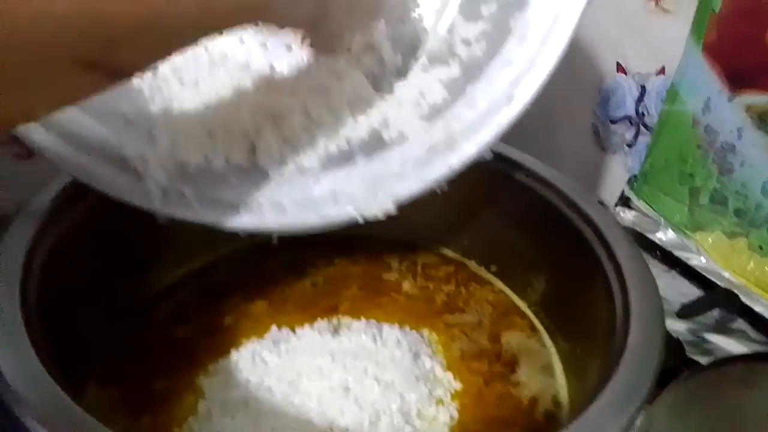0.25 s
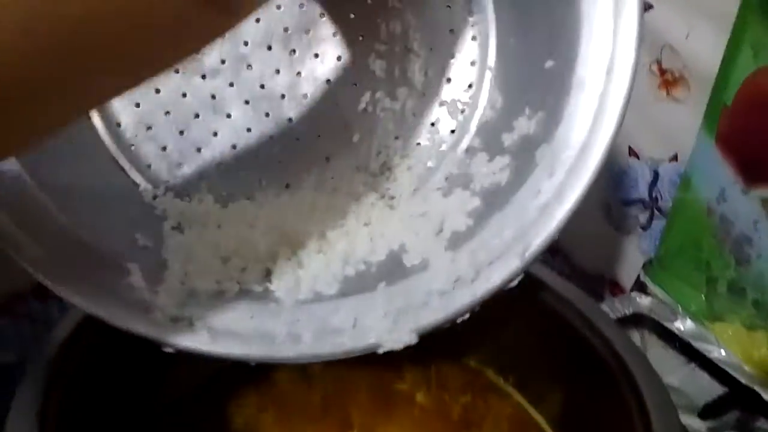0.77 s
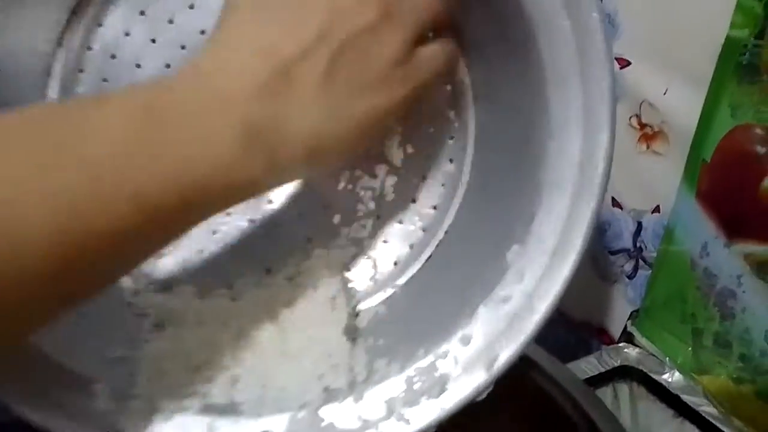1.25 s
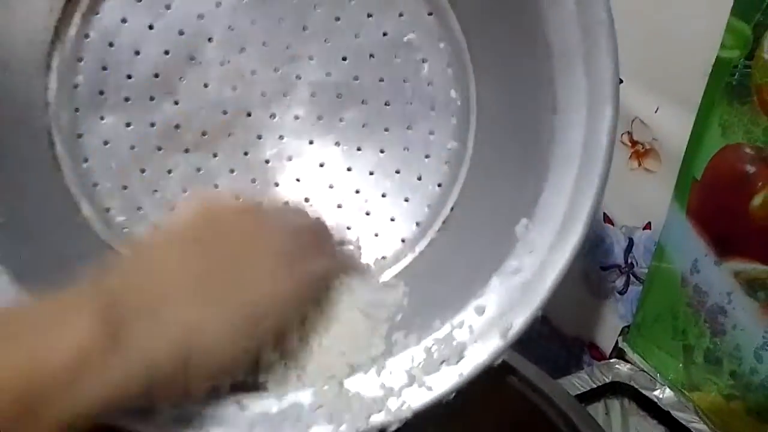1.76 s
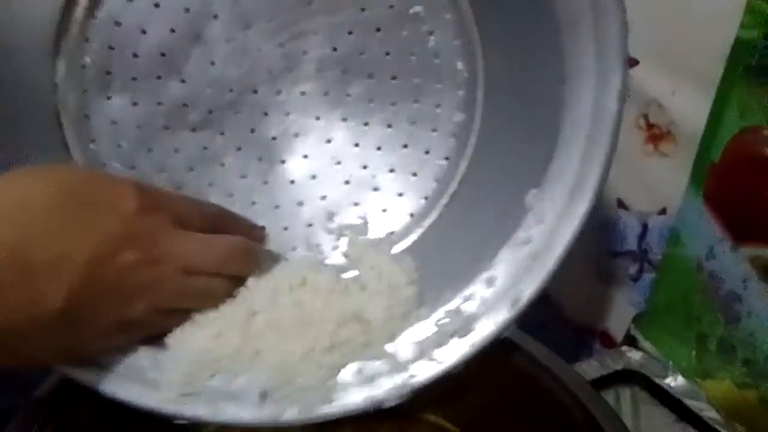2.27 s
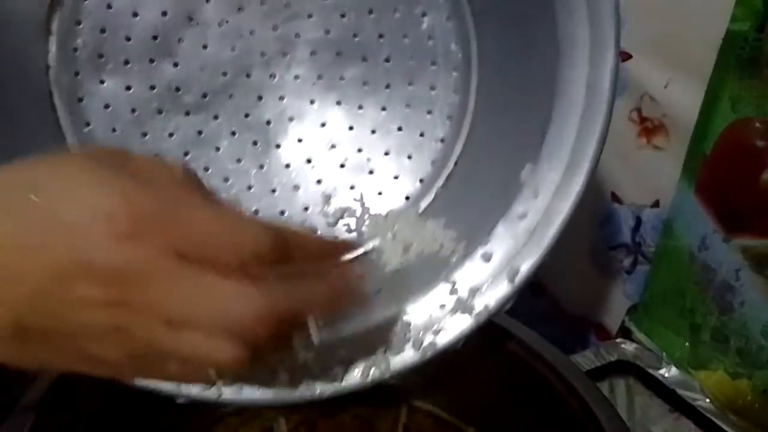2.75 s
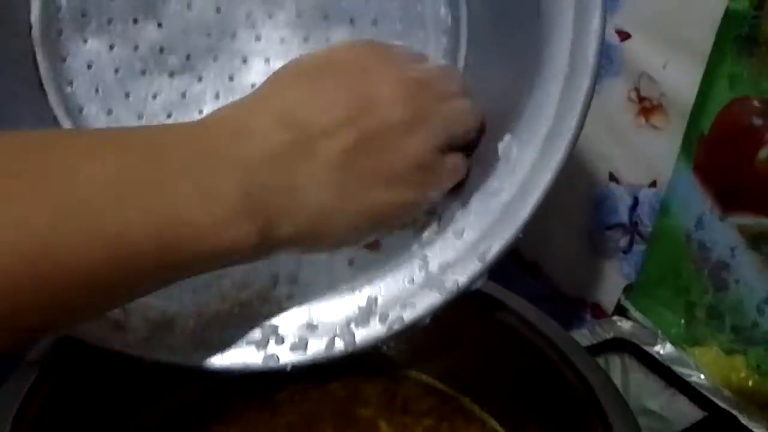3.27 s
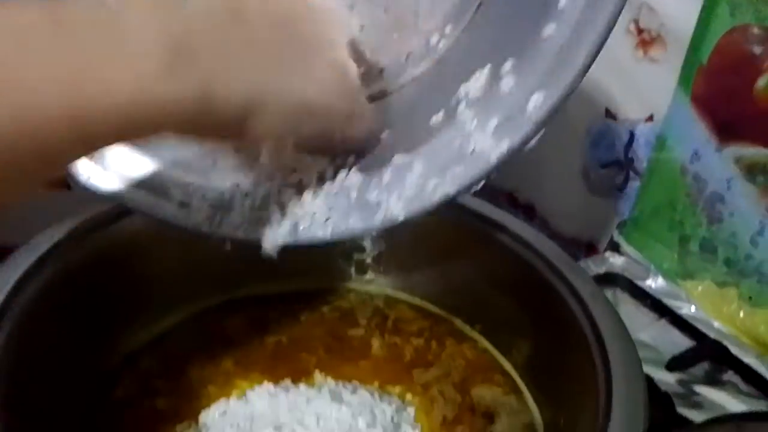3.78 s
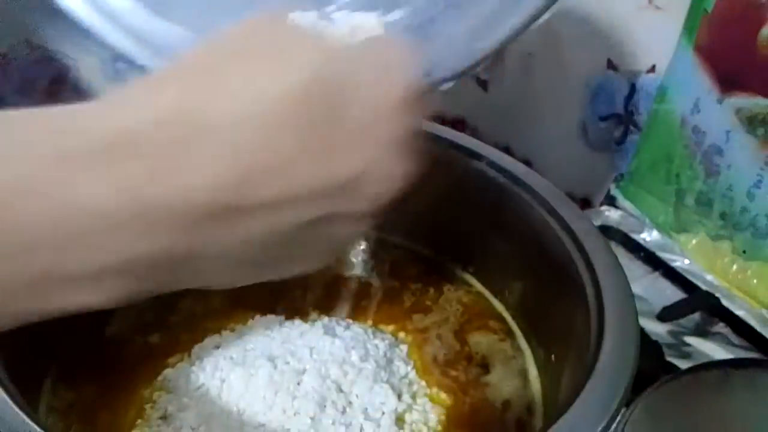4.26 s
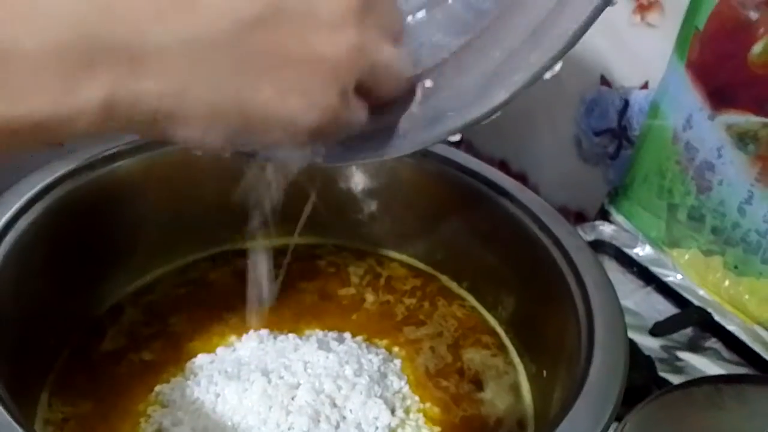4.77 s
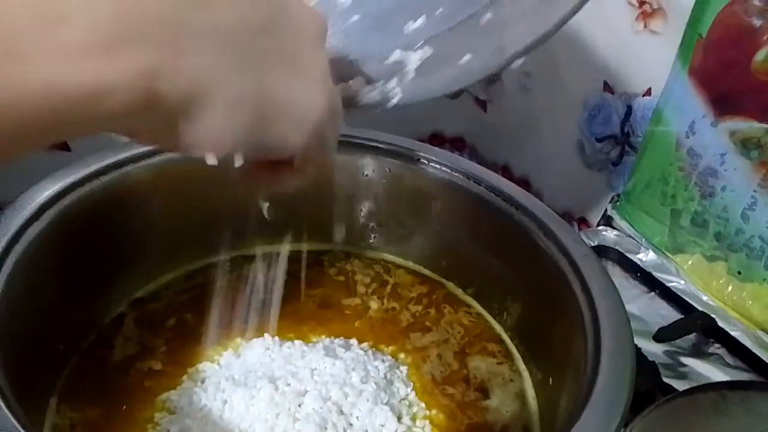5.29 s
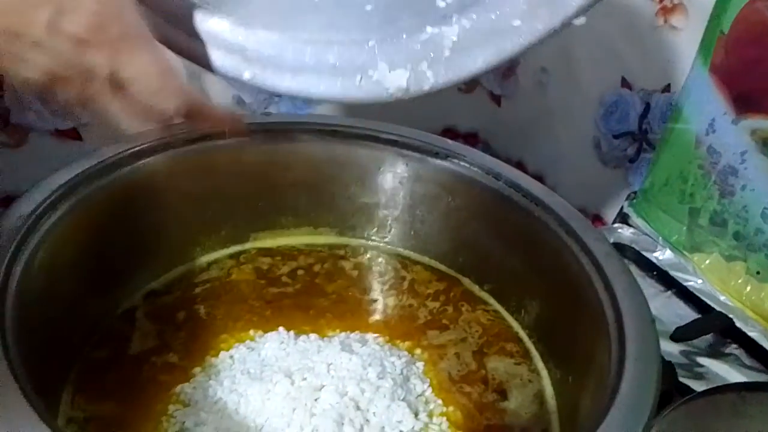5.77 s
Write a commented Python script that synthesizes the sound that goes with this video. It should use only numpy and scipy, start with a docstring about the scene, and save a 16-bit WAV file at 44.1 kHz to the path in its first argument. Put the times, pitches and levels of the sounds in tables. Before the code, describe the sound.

Close up in a small hard kitchen, a hand scrapes wet rice out of an aluminium colander. An early bump rings the bowl, then short strokes rasp and crackle, with nail ticks and faint finger squeaks. A burner and hum continue softly underneath. The scraping thins out, a quiet gap follows, and two loud, ringing knocks on the full pot's rim close the scene.

```python
"""Wet rice crackles and rasps as a hand sweeps it out of an aluminium colander into a pot, in a small tiled kitchen.
The rice is made of random clicks, coloured by wet films, dragged grains and the pressed sheet of metal.
Fingers squeak on the metal as gliding bands of noise; bumps and nail ticks ring it through its modes.
A clump of rice slumps as dull noise, over a steady burner, a hum and the faint ticks of the simmering pot.
At the end the hand knocks on the rim of the pot to shake off the last grains: cracks, modes and low thumps."""
import sys
import numpy as np
from scipy import signal
from scipy.io import wavfile

SR = 44100
rng = np.random.default_rng(int(sys.argv[2]) if len(sys.argv) > 2 else 0)


def wav_record(signal):
    """Record a signal, one row per channel, as 16-bit PCM in the file named by sys.argv[1]."""
    frames = np.transpose(np.atleast_2d(signal))
    bounded = np.clip(frames, -1, 1)
    # unit amplitude maps onto the largest positive 16-bit level
    quanta = np.round(bounded * 32767).astype(np.int16)
    wavfile.write(sys.argv[1], SR, quanta)


N = 265923
T = np.arange(N) / SR  # seconds

# broad resonances of the sheet while the hand presses on it: centre_hz, width_hz, relative level_db
PRESSED_SHEET = [(1251, 98, -3), (1950, 70, -29), (2432, 48, 2.5), (2756, 143, 2.5), (3255, 37, 6),
                 (3607, 163, 3.5), (3950, 170, -5.5), (4370, 81, -3.5), (4700, 125, 4.5), (5200, 180, -7),
                 (5640, 210, 2), (6170, 102, -16.5), (6420, 340, -6), (6710, 130, -1.5), (7000, 160, -4.5),
                 (7740, 203.5, 3), (7700, 180, 2), (9060, 175, 3), (9860, 770, -15.5)]


def amp(db):
    """Turns decibels into a gain."""
    return 10 ** (np.asarray(db) / 20)


def evened(x):
    """Scales to rms 1."""
    return x / np.sqrt(np.mean(x ** 2) + 1e-20)


def unit(x):
    """Scales to energy 1."""
    return x / np.sqrt(np.sum(x ** 2) + 1e-20)


def read(points, hz):
    """Reads a curve on a log-frequency axis."""
    point_hz, value = np.transpose(points)
    return np.interp(np.log(hz + 1), np.log(point_hz + 1), value)


def add(mix, start_s, sound):
    """Mixes a sound in at its start time."""
    part = mix[max(round(start_s * SR), 0):][:len(sound)]
    part += sound[:len(part)]


def colour(x, points, size=4096):
    """Causal minimum-phase filter with the given spectrum and energy 1."""
    hz = abs(np.fft.fftfreq(size, 1 / SR))
    log_gain = np.log(amp(read(points, hz)))
    taps = np.fft.ifft(np.exp(np.conj(signal.hilbert(log_gain)))).real
    return signal.oaconvolve(x, unit(taps[:size // 2]))[:len(x)]


def soften(x, cutoff_hz):
    """A soft contact loses its treble: two equal one-pole low-passes."""
    pole = np.exp(-2 * np.pi * cutoff_hz / SR)
    return signal.lfilter([(1 - pole) ** 2], [1, -2 * pole, pole * pole], x)


def tail():
    """Dense echoes of noise, each band dying at its own speed."""
    # decay of the echoes: pitch_hz, t60_s
    room_decay = [(100, 0.4), (400, 0.78), (1200, 0.79), (2800, 0.63), (7300, 0.57), (15000, 0.51)]
    hz, t, bands = signal.stft(rng.standard_normal(SR), SR, nperseg=256)
    fade = amp(-60 * t / read(room_decay, hz)[:, None])
    echoes = signal.istft(bands * fade, SR, nperseg=256)[1][:SR]
    return unit(echoes * (1 - np.exp(-T[:SR] / 0.00067)))


def ring(modes, wash, wash_db, split=0.0044):
    """A vessel's answer to one tap: modes over a dense wash. It is not quite round, so each mode is a beating pair."""
    t = T[:SR]
    clear = np.zeros(SR)
    for hz, level_db, t60 in modes:
        for side in (-1, 1):
            split_hz = hz * (1 + split * side * rng.random())
            clear += amp(level_db - 60 * t / t60) * np.sin(2 * np.pi * (split_hz * t + rng.random()))
    return unit(unit(clear) + amp(wash_db) * unit(colour(tail(), wash)))


def chatter(decay, rise=0.25):
    """Energy-1 burst of tiny contacts that swells quickly and dies; decay in seconds, rise as a share of it."""
    t = T[:SR // 8]
    contacts = rng.choice([-1., 1.], len(t))
    swell = 1 - np.exp(-t / (rise * decay))
    return unit(contacts * swell * np.exp(-t / decay))


def grains(per_s, spread_db):
    """Clicks at random times, of random size and sign, evened to rms 1."""
    size = amp(spread_db * np.minimum(rng.exponential(1, N), 4)) * rng.choice([-1., 1.], N)
    return evened(size * (rng.random(N) < per_s / SR))


def clumping(rate_hz, depth_db):
    """Random gain: the grains give way in small bunches."""
    drift = evened(soften(rng.standard_normal(N), rate_hz))
    return evened(amp(depth_db * drift))


def effort(start, rise, hold, fade_db_per_s):
    """Gain that rises, holds and dies away; times in seconds."""
    fading_s = np.maximum(T - start - rise - hold, 0)
    return np.clip((T - start) / rise, 0, 1) * amp(-fade_db_per_s * fading_s)


def resonances(peaks):
    """Spectrum (Hz, dB) of steep-sided resonances over a low floor."""
    hz = np.fft.rfftfreq(4096, 1 / SR)
    gain = sum(amp(db) / (1 + ((hz - centre) / width) ** 2) ** 2 for centre, width, db in peaks)
    return np.column_stack([hz, 20 * np.log10(gain + amp(-43.5))])


def sheet_ring(t60, count=240):
    """The pressed sheet rings briefly in many close modes, grouped into its broad resonances."""
    t = T[:SR // 3]
    hz = np.linspace(1000, 11000, count) + rng.uniform(-20, 20, count)
    waves = np.sin(2 * np.pi * (hz[:, None] * t + rng.random((count, 1))))
    scatter_db = 9.9 * rng.standard_normal(count)
    level = amp(read(resonances(PRESSED_SHEET), hz) + scatter_db)
    return unit(level @ waves * amp(-60 * t / t60))


def hand():
    """The pressure of each stroke drives the rasp, the singing sheet and the wet crackle: three gain curves."""
    # strokes through the rice: start_s, rise_s, hold_s, grain rasp_db, sheet singing_db, wet crackle_db
    strokes = [(0, 0.0017, 0.021, -60, -59.5, -62), (0.069, 0.019, 0.13, -64.5, -56.5, -58),
               (0.464, 0.072, 0.024, -77, -47.5, -72), (0.84, 0.053, 0.013, -70, -49.5, -56),
               (1.29, 0.085, 0.14, -72, -82, -67), (1.596, 0.1, .1, -70, -77, -56.5),
               (2.2, 0.12, 0.077, -72, -101, -90), (2.472, 0.038, 0.074, -71.5, -71.5, -56.5),
               (2.733, 0.028, .09, -68.5, -79, -63), (2.87, 0.046, 0.38, -74, -84, -61.5),
               (3.27, .14, 0.22, -72, -82, -63.5), (3.78, 0.047, 0.015, -63.5, -74, -63.5),
               (4.038, 0.16, 0.1, -73.5, -74.5, -63), (4.425, 0.023, 0.045, -74, -87, -79)]
    ease_db_per_s = 113.5  # the pressure of every stroke dies away alike
    gains = np.zeros((3, N))
    for start, rise, hold, *levels_db in strokes:
        gains += amp(levels_db)[:, None] * effort(start, rise, hold, ease_db_per_s)
    return gains


def wet_rice(squeeze):
    """Water films between the grains burst in a high crackle; whole clumps snap louder and tick on the sheet."""
    # crackle of wet grains: pitch_hz, relative density_db (per Hz)
    squeeze_tone = [(1500, -88), (4000, -25), (7100, -11), (7750, 3.5), (8400, 7.5), (9050, 3), (9700, -13),
                    (10800, -31), (16000, -23.5)]
    # clumps that snap off the metal: start_s, level_db, sheet's answer against the wet burst body_db
    snaps = [(1.0395, -40, -9), (1.066, -37.5, -18), (1.6681, -44, -7), (1.829, -39.5, -24),
             (1.9117, -38, -37), (2.05, -44.5, -4), (2.155, -46, -7), (2.367, -50.5, 0), (2.4968, -38, -25),
             (2.635, -42.5, -12), (2.961, -42.5, -19), (3.005, -34.5, -5.5), (3.5194, -46, -21),
             (3.5483, -37.5, -24), (3.6808, -45, -6), (3.7404, -46, -29), (4.035, -46.5, -23),
             (4.0948, -43.5, -3.5), (4.4365, -49, -10)]
    snap_decay_s, burst_db, answer_db = 0.002, 1.5, 0.5
    # the rice crackles by itself until the colander is empty
    crackle_db, empty_s, drain_db_per_s = -66, 4.15, 31

    resting = amp(crackle_db - drain_db_per_s * np.maximum(T - empty_s, 0))
    pops = clumping(rate_hz=38, depth_db=3.5) * grains(per_s=1400, spread_db=2.0)
    out = colour(np.hypot(resting, squeeze) * pops, squeeze_tone)
    sheet = resonances(PRESSED_SHEET)
    for start, level_db, body_db in snaps:
        burst = colour(chatter(snap_decay_s, rise=0.2), squeeze_tone)
        body = colour(chatter(2 * snap_decay_s, rise=0.087), sheet)
        snap = amp(burst_db) * burst + amp(answer_db + body_db) * body
        add(out, start, amp(level_db) * snap / abs(burst).max())
    return out


def dragging(rasp_gain, singing_gain):
    """Grains catch on the holes; each catch rasps and sings in the pressed sheet."""
    # rasp of dragged grains: pitch_hz, relative density_db (per Hz)
    drag_tone = [(100, -35), (700, -23), (1700, -5.5), (2700, -2), (4200, -5), (6000, -6), (9000, -5.5),
                 (10500, -19.5), (16000, -23)]
    fizz_db = -18  # bright, uncoloured part of grains skidding on the bare sheet
    catches = grains(per_s=2000, spread_db=1.5) * clumping(rate_hz=32, depth_db=3.0)
    singing = signal.oaconvolve(catches, sheet_ring(t60=0.038))[:N]
    singing += colour(catches, resonances(PRESSED_SHEET))
    return singing_gain * (singing + amp(fizz_db) * catches) + rasp_gain * colour(catches, drag_tone)


def rubs():
    """Wet skin slips on metal: a fuzzy squeak that swells with the pressure and fades."""
    # fingers rubbing: start_s, length_s, start_hz, end_hz, fuzz cut-off width_hz, relative level_db
    rub_table = [(0, 0.14, 913, 1113, 383, -53), (0, .13, 2070, 1970, 200, -63),
                 (0.824, 0.032, 3600, 3470, 198.6, -52.5), (0.869, 0.091, 2407, 2507, 81.7, -59.5),
                 (0.893, 0.028, 3200, 3480, 70, -51.5), (1.109, 0.039, 3530, 3470, 400, -61.5),
                 (1.113, 0.074, 2815, 2840, 39.6, -68), (1.502, 0.131, 1960, 1872, 647, -62),
                 (1.694, 0.13, 5220, 5870, 1180, -61), (1.703, 0.2, 1250, 1518, 185, -69),
                 (2.735, 0.2, 2480, 2450, 260, -68), (2.938, 0.246, 5950, 6020, 160, -68.5),
                 (3.104, 0.063, 1240, 1273, 189, -62), (3.127, .2, 1950, 1575, 340, -68),
                 (3.319, 0.073, 1750, 1647, 295, -62.5), (3.322, 0.082, 4290, 4290, 40, -65),
                 (4.412, 0.23, 2200, 2190, 760, -76.5), (5.377, 0.16, 3200, 3110, 1120, -52)]
    grip_share = 0.011  # time constant of the swell as a share of the length
    out, t = np.zeros(N), T[:SR // 2]
    for start, length, start_hz, end_hz, width_hz, level_db in rub_table:
        glide_hz = start_hz + (end_hz - start_hz) * np.minimum(t / length, 1)
        turn = np.exp(2j * np.pi * np.cumsum(glide_hz) / SR)
        jitter = rng.standard_normal(SR) + 1j * rng.standard_normal(SR)
        slips = soften(soften(jitter, width_hz), width_hz)[-len(t):]
        pressure = (1 - np.exp(-t / (grip_share * length))) * np.exp(-(t / length) ** 2)
        # turning the slow noise moves it up to the gliding pitch
        add(out, start, amp(level_db) * pressure * evened((slips * turn).real))
    return out


def stove():
    """Steady burner noise, a low hum, the hollow tone of the pot as narrow noise and the ticks of simmering."""
    # burner noise: pitch_hz, relative density_db (per Hz)
    burner_tone = [(15, -48), (25, -3), (53, -7.5), (117, -7), (149, -22), (170, -6.5), (354, -9),
                   (394, -10), (476, -9.5), (734, -12), (796, -19.5), (1040, -14), (1260, -7), (1650, -20),
                   (16000, -39)]
    # steady tones, two of the hum and two of the hollow pot: pitch_hz, rms level_db
    steady_tones = [(48.4, -87), (145.3, -77), (823.6, -84), (1292, -82.5)]
    # ticks of the simmering broth: pitch_hz, relative density_db (per Hz)
    simmer_tone = [(500, -21), (2000, -15), (3200, -7), (8500, -4.5), (10500, -23), (16000, -20)]
    out = amp(-72) * evened(colour(rng.standard_normal(N), burner_tone))
    for hz, level_db in steady_tones[:2]:
        out += amp(level_db) * np.sqrt(2) * np.sin(2 * np.pi * (hz * T + rng.random()))
    for hz, level_db in steady_tones[2:]:
        waver = soften(rng.standard_normal(N), 29)
        out += amp(level_db) * evened(waver * np.cos(2 * np.pi * hz * T))
    simmer = amp(-83.0) * colour(grains(per_s=940, spread_db=-4), simmer_tone)
    return out + simmer


def bumps():
    """The hand hits the colander: a crack, then the bowl rings."""
    # colander modes: pitch_hz, relative level_db, t60_s
    bowl_modes = [(584, -18.5, 0.34), (623, -4, 0.22), (717, -22.5, 0.076), (703, -3, 0.5),
                  (1118, -12, 0.34), (1155, -5, 0.22), (1253, 1.5, 0.58), (1520, -12, 0.2),
                  (1603, -24, 0.36), (1707, -27, 0.43), (1950, -2, 0.14), (2202, -18, .5), (2803, 5, 0.27),
                  (3313, 3, 0.11)]
    # dense wash of many close modes, about as loud as the named ones: pitch_hz, relative density_db (per Hz)
    bowl_wash = [(40, -40), (200, -6.5), (350, -15.5), (520, -2), (680, 3), (950, -12.5), (1250, 3),
                 (1750, -0.5), (2700, -2), (3500, -3), (4500, -12), (8500, -16.5), (10500, -32),
                 (16000, -50.5)]
    # first crack of a blow: pitch_hz, relative density_db (per Hz)
    bowl_crack = [(60, -31.5), (330, -12.5), (680, -16), (950, -21), (1300, 3.5), (3300, -7), (4300, -3),
                  (8600, 9.5), (10500, -16.5), (16000, -47)]
    # bumps of the hand: start_s, ring_db, crack_db, softness as cutoff_hz, contact_s
    bump_table = [(0.2919, 1, -4.5, 13900, 0.0045), (0.306, -20.5, -19, 7900, 0.0085),
                  (.342, -7.5, -31, 6000, 0.0056), (0.567, -19.5, -15.5, 12300, 0.0039),
                  (1.504, -17, -25, 1900, 0.0034), (1.559, -24.5, -40, 2380, .01),
                  (2.035, -45, -36, 6100, 0.0025), (3.112, -33, -25.5, 3200, 0.0071),
                  (3.68, -33.5, -35.5, 4850, 0.0018)]
    out, bowl = np.zeros(N), ring(bowl_modes, bowl_wash, wash_db=-0.5)
    for start, ring_db, crack_db, cutoff_hz, contact in bump_table:
        crack = colour(chatter(contact), bowl_crack)
        add(out, start, amp(crack_db) * unit(soften(crack, cutoff_hz)))
        add(out, start + contact / 2, amp(ring_db) * unit(soften(bowl, cutoff_hz)))
    return out


def clump():
    """The dull rumble of a clump of rice that slumps into the broth: low noise that swells and fades."""
    # dull rumble: pitch_hz, relative density_db (per Hz)
    clump_tone = [(25, -27), (55, -9.5), (85, -8.5), (130, -11), (200, -6), (300, -29.5), (800, -13),
                  (3000, -35), (16000, -67.5)]
    slump = effort(start=0.3, rise=0.044, hold=0.035, fade_db_per_s=84)
    return amp(-50) * slump * evened(colour(rng.standard_normal(N), clump_tone))


def ticks():
    """Each fingernail lands on another spot: a sharp click, then its own mix of modes."""
    # fingernails on the sheet: start_s, ring_db, softness as cutoff_hz
    tick_table = [(0.757, -23, 8550), (.828, -34, 3130), (.96, -26, 8980), (1.111, -27.5, 5000),
                  (2.039, -42.5, 8050), (2.138, -38.5, 9150), (2.743, -32, 4000), (3.111, -26, 7000),
                  (3.473, -31.5, 7000), (3.56, -29.5, 7000), (3.97, -38.5, 6000)]
    click_db = -2.5  # against the ring
    out = np.zeros(N)
    for start, ring_db, cutoff_hz in tick_table:
        click = colour(chatter(decay=0.0017, rise=0.12), resonances(PRESSED_SHEET))
        add(out, start, amp(ring_db + click_db) * unit(soften(click, cutoff_hz)))
        add(out, start, amp(ring_db) * unit(soften(sheet_ring(t60=0.21), cutoff_hz)))
    return out


def knocks():
    """The rim chatters under the hand, the full pot thumps on its grate and rings."""
    # pot modes: pitch_hz, relative level_db, t60_s
    pot_modes = [(227.4, 13, 0.38), (285, -18, 0.47), (345, -26, 0.28), (518, -19, .4), (700, 2.5, 0.53),
                 (1195, 10, 0.62), (1410, -14, .3), (1550, 9, 0.67), (1460, -22, 0.38), (1740, -5, 0.57),
                 (2020, -22.5, .4), (1920, -22.5, .5), (2070, -10, 0.44), (2320, -12, 0.47),
                 (2398, 23, 0.2), (2520, -14, 0.4), (3250, -11, 0.36), (3160, -24, 0.32), (3800, -21, .42),
                 (4770, -9, 0.49), (4700, -9, .35), (6140, -10, .4), (6950, -21, .4)]
    # dense wash of many close modes, louder than the named ones: pitch_hz, relative density_db (per Hz)
    pot_wash = [(40, -16), (75, 0.5), (110, 0.5), (190, -2.5), (280, 5.5), (380, -8.5), (700, -10.5),
                (960, -11.5), (1430, 4.5), (1590, -9.5), (1720, -0.5), (1950, -0.5), (2400, 5),
                (2850, -9.5), (3700, -2), (5500, -5), (8700, -6.5), (10200, -19), (16000, -17.5)]
    # first crack of a blow: pitch_hz, relative density_db (per Hz)
    pot_crack = [(60, -17), (330, -22), (520, -1), (720, -12.5), (920, -13.5), (1160, 5), (1650, -3),
                 (2500, 7.5), (3700, 6.5), (5200, 0), (8600, 1.5), (10200, -15), (16000, -16)]
    # thump of the full pot on its grate: pitch_hz, relative density_db (per Hz)
    thump_tone = [(30, -39), (80, -13), (140, 1.5), (220, 8), (290, 2), (400, -11.5), (900, -41)]
    # hollow clonk of its wall: pitch_hz, relative density_db (per Hz)
    clonk_tone = [(150, -20.5), (380, 7), (490, 11.5), (720, 7), (900, -20), (2000, -30)]
    # knocks on the rim: start_s, ring_db, crack_db, thump_db, wall clonk_db, softness as cutoff_hz, contact_s
    knock_table = [(5.381, -11, -18, -20.5, -34, 14200, 0.0034),
                   (5.392, -25.5, -16, -32, -40, 7600, 0.0024), (5.626, 0.5, 6.5, -4.5, -18, 11700, 0.0026),
                   (5.641, -1.5, -22, -35, -40, 3800, 0.00187),
                   (5.777, -44, -19.5, -48, -46, 18000, 0.0036), (5.8647, -2, 4, 1, -2.5, 8650, 0.0038)]
    out, low, pot = np.zeros(N), np.zeros(N), ring(pot_modes, pot_wash, wash_db=4.0)
    push = signal.unit_impulse(SR // 8)
    thump, clonk = colour(push, thump_tone), colour(push, clonk_tone)
    for start, ring_db, crack_db, thump_db, clonk_db, cutoff_hz, contact in knock_table:
        crack = colour(chatter(contact, rise=1.0), pot_crack)
        add(out, start, amp(crack_db) * unit(soften(crack, cutoff_hz)))
        add(out, start + contact / 2, amp(ring_db) * unit(soften(pot, cutoff_hz)))
        add(low, start + contact / 2, amp(thump_db) * thump + amp(clonk_db) * clonk)
    # the low part gets an echo of its own
    return out + low + amp(-15) * signal.oaconvolve(low, tail())[:N]


def scene():
    """Everything sounds close by, in a small hard room."""
    rasp, singing, squeeze = hand()
    rice = wet_rice(squeeze) + dragging(rasp, singing) + ticks()
    slips = rubs()
    blows = bumps() + knocks()
    to_room = amp(-20.5) * blows + amp(-11) * rice + amp(-6.5) * slips
    room = signal.oaconvolve(to_room, tail())[:N]
    return (blows + rice + amp(1.5) * slips + clump() + room + stove())[None]


def record(dry):
    """Band limit: a steep low-pass takes off the top treble."""
    edge_hz = 15900
    taps = signal.firwin(511, edge_hz, window=("kaiser", 9), fs=SR)
    return signal.oaconvolve(dry, taps[None], "same")


dry = scene()
out = record(dry)
wav_record(out)
```